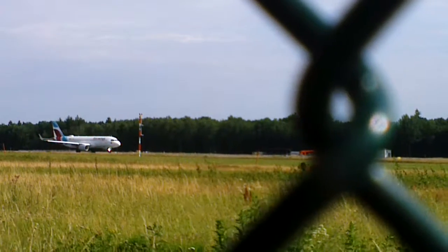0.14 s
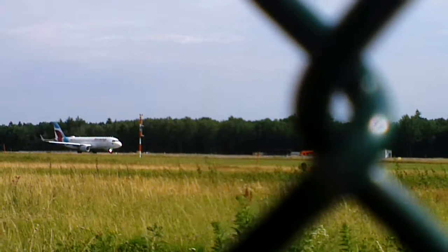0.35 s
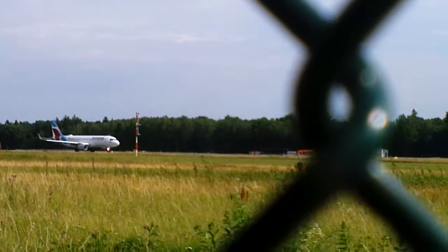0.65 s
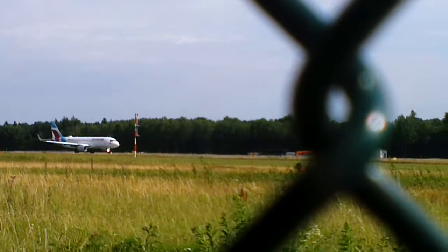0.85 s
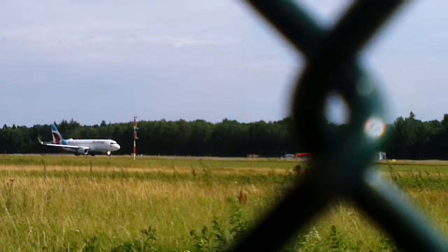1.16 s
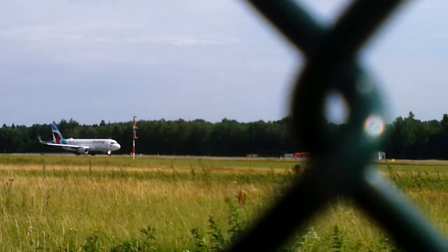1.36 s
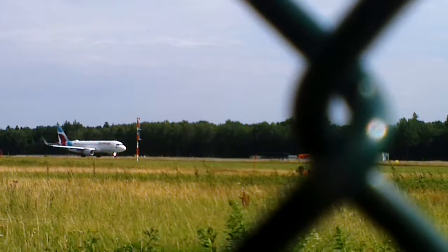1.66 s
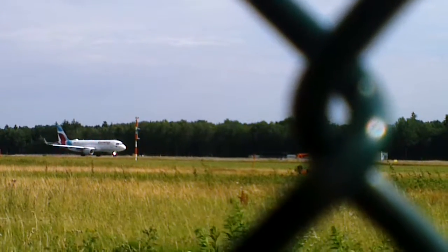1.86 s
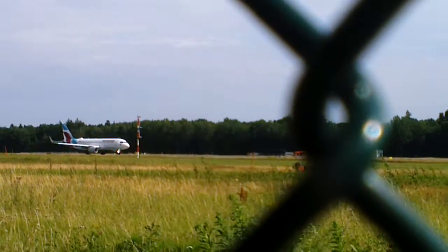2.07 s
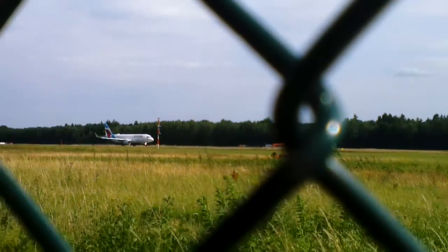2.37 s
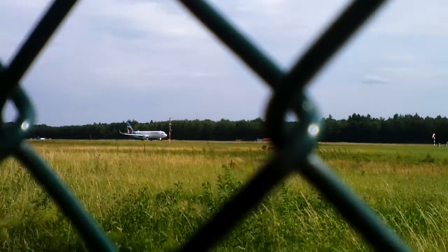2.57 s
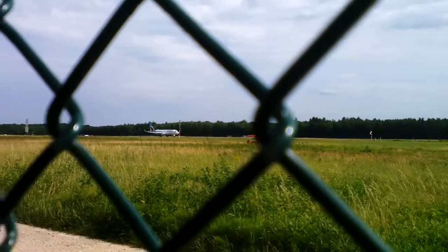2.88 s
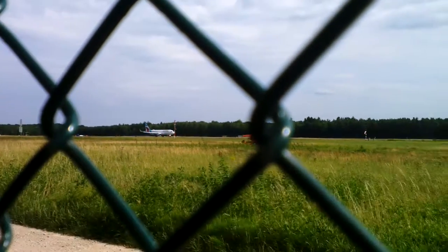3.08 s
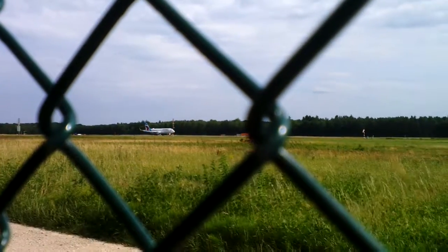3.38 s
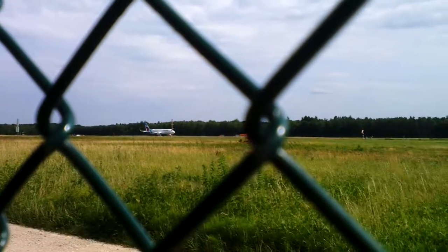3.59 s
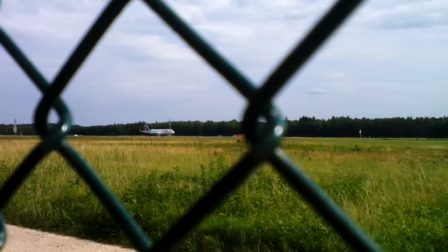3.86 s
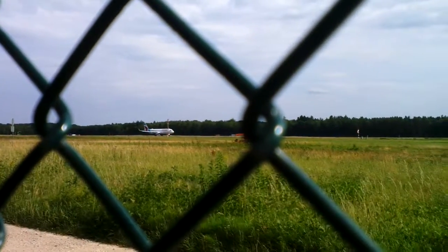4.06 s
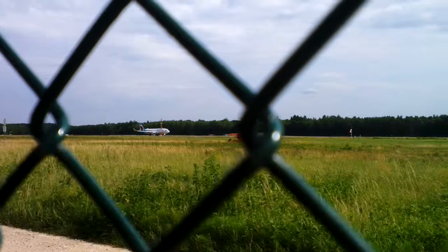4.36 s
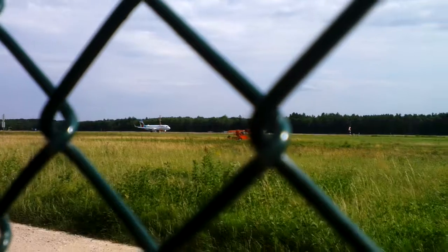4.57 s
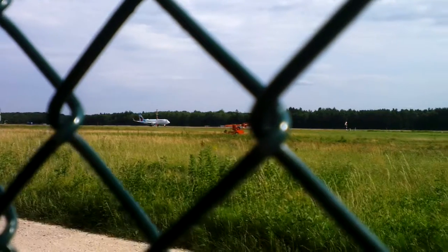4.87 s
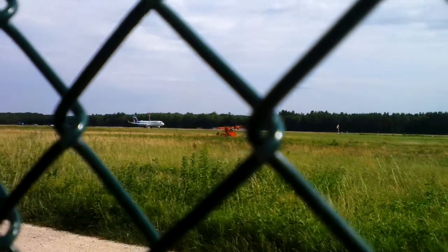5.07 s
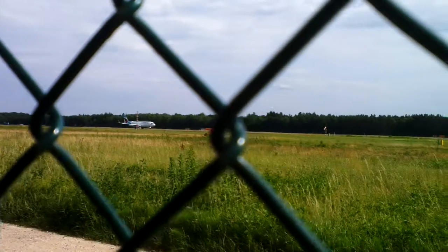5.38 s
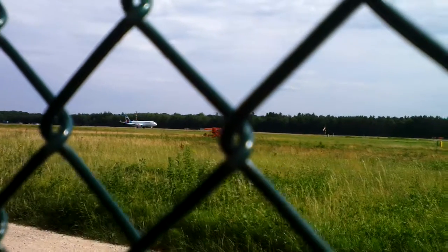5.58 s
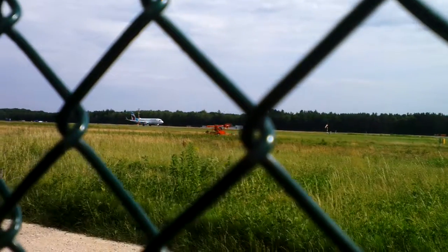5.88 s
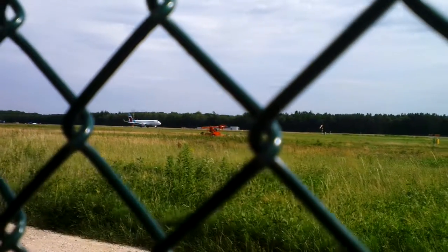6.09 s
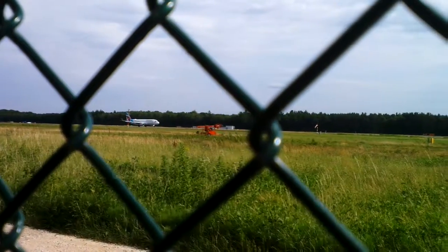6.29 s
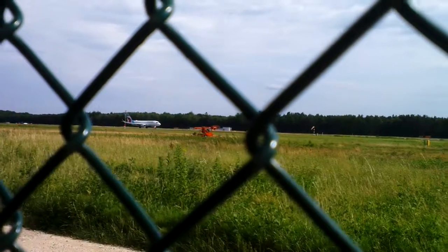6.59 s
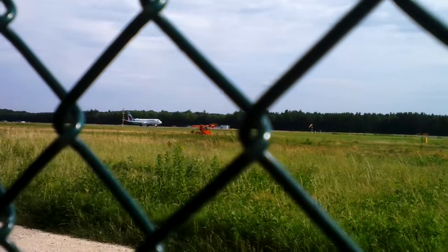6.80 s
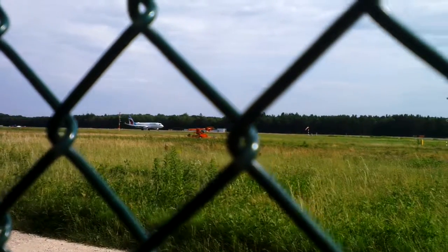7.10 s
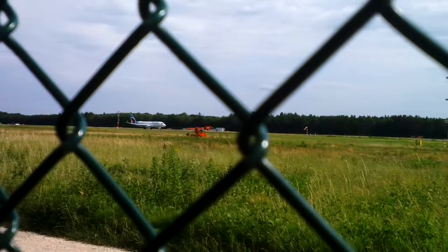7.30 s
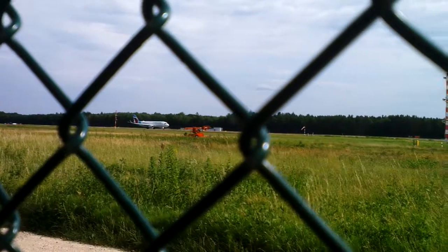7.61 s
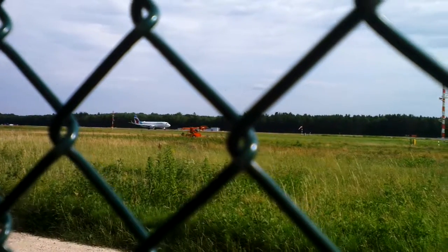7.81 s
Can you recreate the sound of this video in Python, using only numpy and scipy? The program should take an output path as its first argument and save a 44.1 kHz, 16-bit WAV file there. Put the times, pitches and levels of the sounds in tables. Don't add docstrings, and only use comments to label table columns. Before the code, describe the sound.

In an open meadow, a distant twin-engine airliner is heard on a small stereo microphone. At 0 s its engines give a quiet, wavering whine around 1 kHz in thin, airy noise. The pitch climbs until about 1.6 s, holds near 1.6 kHz until 2.5 s, then rises again, reaching about 2.6 kHz by 4.7 s. The roar swells strongly between 3 and 5 s, gaining a rough, raspy buzz beneath the whine, then stays loud and nearly steady in pitch, flickering as moving air bends it, to the end near 8 s. Dull wind knocks, stronger on the right, cluster at 1-1.7 s and 2.5 s, with light taps until 3.3 s; bigger bumps come at 5.2-6.4 s, strongest around 5.9 and 6.2 s, then thin out. From 2.75 s a bush cricket scrapes fast and high, around 10 kHz, slightly left, half masked by the jet. Faint insect and leaf hiss continues throughout.

```python
import sys
import numpy as np
from scipy import signal
from scipy.fft import rfft, irfft
from scipy.io import wavfile
from scipy.ndimage import uniform_filter1d, minimum_filter1d

SR = 44100
rng = np.random.default_rng(int(sys.argv[2]) if len(sys.argv) > 2 else 0)


def invert_db(level):
    return 10 ** (np.asarray(level, dtype=float) / 20)


def wav_out(sig):
    wavfile.write(sys.argv[1], SR, np.round(np.clip(np.atleast_2d(sig).T, -1, 1) * 32767).astype(np.int16))


N = 350532
TIME = np.arange(N) / SR

# (time [s], blade-passing frequency [Hz])
FAN_SPEED = [(0.0, 1026), (0.25, 1084), (0.7, 1256), (1.05, 1445), (1.4, 1552), (1.65, 1585), (2.5, 1577),
             (2.9, 1689), (3.2, 1850), (3.9, 2268), (4.25, 2421), (4.7, 2603), (4.9, 2641), (5.1, 2675),
             (5.4, 2692), (6.3, 2710), (6.8, 2725), (7.95, 2731)]
# (blade rate [Hz], second [dB], third [dB])
BLADE_OVERTONES = [(1010, -7.5, 0.5), (1290, -1.5, 1), (1620, -0.5, -20), (1790, 6.5, -11),
                   (2230, -4.5, -21), (2320, -14, -30), (2600, -20.5, -59.5), (2640, -30, -61)]
# (time [s], level [dB])
CORE_WHISTLE = [(.7, -73), (1.1, -59), (1.8, -59.5), (2.6, -59.5), (3.1, -68), (3.6, -76)]
BUZZ_ORDERS = list(zip([9, 11, 12, 14, 15, 16, 17, 19, 20, 22, 23, 24, 27, 28, 30, 32, 35, 39, 41, 47, 52, 56],
               [-52, -52, -44, -41, -39, -40, -37, -34, -33, -39, -48, -36, -40, -40, -39, -37, -34, -36, -35, -36, -42, -42],
               [-47, -44, -50, -41, -43, -42, -39, -38, -39, -36, -42, -29, -41, -38, -40, -37, -37, -38, -38, -37, -42, -45]))
# (blade rate [Hz], level [dB])
TIP_SHOCK = [(2200, -35), (2440, -12), (2620, -5), (2700, -1.5)]
# (shaft order, time [s], height [dB], half length [s])
BUZZ_LOBES = [(24, 6.55, 5.5, 0.13), (24, 7.38, 6, 0.076), (24, 7.75, -6.5, 0.18), (22, 7.45, -5, 0.093),
              (19, 5.23, 0, 0.16), (14, 7.5, 5, .15), (24, 6, -8, .12), (28, 6.6, 12, .1),
              (19, 6.15, 7, 0.064), (20, 5.7, -1, 0.17), (17, 7.5, 5, .1)]
# (frequency [Hz], density [dB per Hz])
PART_POWER_ROAR = [(60, -84), (100, -48), (250, -31.5), (540, -21), (1300, -13), (1800, -14.5),
                   (2100, -14.5), (2730, -7), (3500, -6.5), (4700, -18), (6700, -34), (8700, -62),
                   (14700, -120)]
# (frequency [Hz], density [dB per Hz])
FULL_POWER_ROAR = [(60, -99), (100, -67), (250, -37.5), (680, -15), (920, -13), (1300, -10), (1650, -9),
                   (1950, -16), (2400, -9), (2900, -7.5), (3620, -9), (5000, -25), (6700, -38.5),
                   (8700, -64.5), (12000, -83.5)]
# (centre [blade multiples], width [blade multiples], height [dB])
BLADE_HUMPS = [
    (1., .08, 3.5),
    (2., .12, 1.5),
    (2.85, .2, 2.5),
    (3.9, .2, 5.5),
]
# (low edge [Hz], high edge [Hz])
POWER_BANDS = [
    (800, 1000),
    (3300, 4200),
    (5800, 7000),
]
# (frequency [Hz], likeness [0-1])
PORT_LIKENESS = [(60, 0.41), (120, 0.69), (230, 0.88), (440, 0.84), (850, 0.56), (1660, 0), (3220, 0.45),
                 (6250, 0.26)]
# (frequency [Hz], left minus right [dB])
PORT_LEAN = [(60, -5), (100, -9), (170, -1), (280, 2), (470, -2), (790, -1), (1330, -1.5), (2230, -2.0),
             (3730, -4.5), (6250, -9.5)]
# (time [s], left minus right [dB])
DIRECTION = [(0.0, -1.5), (2.1, -3.5), (2.65, -2.5), (2.97, -4.0), (6.77, -2.5), (7.95, -4)]
# (time [s], jet rumble [dB], treble clearness of the air path [dB], blade tone over roar [dB])
AIR_PATH = [(0.0, -59.5, 5, 4), (0.5, -60, 7, -4), (0.9, -57, 8, -2), (1.2, -56.5, 9.5, 4.5),
            (1.6, -58, 10.5, 3.5), (2.4, -58, 13.5, 5), (2.8, -56, 9.5, -2), (3.3, -54, 14, -4.5),
            (3.75, -50, 16, 4.5), (4.1, -47.5, 16.5, 2.5), (4.7, -42.5, 17, 7), (5.2, -39, 16.5, 3.5),
            (5.7, -38, 12, 6), (6.0, -38.5, 10.5, 0), (6.55, -37, 14.5, 2.5), (6.9, -39.5, 10, 6),
            (7.4, -39.5, 8, 7.5), (7.95, -37.5, 4.5, 3)]
# (time [s], change [dB])
LENS_EDDIES = [(.1, -1), (.6, 2.5), (1.2, 1.5), (1.82, 6), (2.1, 3.5), (2.6, 5), (3.62, 0.5), (4.698, 2.5),
               (5.2, 3), (5.301, 0), (5.431, 11), (5.88, 9), (6.3, 4), (6.499, 12.5), (6.6, -2.5),
               (6.99, 1), (7.06, -15), (7.2, 2.5), (7.31, 2.5), (7.42, 0.5), (7.5, -6), (7.6, 5.5),
               (7.7, 4.5)]
# (time [s], level [dB], half length [s])
WIND_GUSTS = [(0.398, -59, 0.084), (0.807, -56, 0.1), (1.123, -50.5, 0.13), (1.675, -49.5, 0.12),
              (1.85, -67, 0.095), (2.527, -49.5, 0.034), (2.905, -57, 0.091), (5.4, -55, .15),
              (5.72, -58, 0.17), (6.3, -59.5, 0.25), (6.93, -54, 0.2)]
# (time [s], peak [dB], pitch [Hz], length [ms])
PORT_KNOCKS = [(0.194, -29.5, 526, 11.4), (0.21, -31, 312, 8.1), (0.844, -33, 460, 9.5),
               (1.035, -31, 416, 12), (1.068, -27, 445, 2.1), (1.115, -26, 323, 14.7),
               (1.14, -34, 420, 9.7), (1.349, -32.5, 682, 14), (1.509, -23.5, 380, 7.2),
               (1.527, -31, 622, 13), (1.557, -25, 595, 17.2), (1.568, -20, 301, 16.5),
               (1.657, -24.5, 292, 14), (1.727, -34, 453, 14), (2.511, -26, 653, 9.3),
               (2.549, -26, 496, 8.6), (2.601, -30.5, 357, 10.7), (5.234, -25, 310, 16),
               (5.311, -30, 543, 11), (5.484, -22, 611, 10), (5.587, -22.5, 455, 9.8),
               (5.623, -21, 730, 11), (5.868, -23.5, 720, 20), (5.901, -16.5, 362, 13.4),
               (6.208, -23, 730, 24), (6.234, -14, 648, 8.9), (6.317, -21, 450, 13.4),
               (6.359, -19, 524, 10.3), (6.773, -28, 407, 7.1), (7.038, -30, 616, 9.4)]
# (time [s], peak [dB])
LIGHT_TAPS = [(0.484, -43), (0.791, -48), (0.942, -40), (0.977, -41), (1.179, -44), (1.26, -39),
              (1.481, -38), (1.63, -40), (1.769, -39), (1.909, -40), (2.302, -42.5), (2.476, -37),
              (2.803, -39.5), (2.92, -52), (2.969, -42), (3.168, -39), (3.349, -39)]
# (time [s], level [dB])
CRICKET_LEVEL = [(2.76, -55.5), (3.3, -58), (3.8, -61), (4.3, -57), (5.35, -57.5), (5.95, -63), (6.55, -55),
                 (6.85, -60.5), (7.2, -53), (7.95, -62)]
# (time [s], strokes so far)
WING_STROKES = [(2.76, 0.06), (2.96, 4.46), (3.7, 20.14), (5.56, 60.37), (6.16, 72.87), (7.5, 101.7),
                (7.95, 111.14)]
# (place [strokes], width [strokes], level [dB])
SCRAPES = [
    (.2, .035, 0),
    (.52, .05, -3),
    (.85, .06, -15),
]
# (frequency [Hz], density [dB per Hz])
WING_RESONANCE = [(8000, -25.5), (8700, -10), (9400, -2), (9900, 5), (10700, 0.5), (11350, -5.5),
                  (12000, -10), (13000, -21.5), (14500, -27)]
# (frequency [Hz], density [dB per Hz])
MEADOW_COLOUR = [(6000, -11), (7500, 0), (9500, -2), (11000, -4), (13500, -14.5), (15300, -14)]

BLADES, CORE_ORDER = 36, 128
TWIN_SLIP, TWIN_DB = .007, -3.5
GOVERNED_HZ = 2450, 2690
TIPS_CLEAR = 0.21
EDDY_S, EDDY_ON_ROAR = 0.022, 0.2
HISS_DB, HISS_FULL_DB = -12.5, -6
FRAME = 512
CALM_DB = -69
TAP_HZ, TAP_MS = 435, 10.7
SINGING_S = 2.75
CRICKET_BLUR, BLUR_PER_S = .16, .18
CEILING, LIMIT_S = .8, .004


def read(table, t):
    s, *columns = np.transpose(table)
    return np.array([np.interp(t, s, c) for c in columns])


def on_log(table, hz):
    log_table = [(np.log(max(f, 1)), v) for f, v in table]
    return read(log_table, np.log(np.maximum(hz, 1)))[0]


def bumps(t, rows):
    return sum(h * np.exp(-((t - s) / w) ** 2 / 2) for s, h, w in rows)


def unit(x):
    return x / np.sqrt(np.mean(np.abs(x) ** 2))


def band(x, lo_hz, hi_hz):
    return signal.sosfilt(signal.butter(2, [lo_hz, hi_hz], "band", fs=SR, output="sos"), x)


def colour(x, table):
    gain = invert_db(on_log([(table[0][0] / 2, -90)] + table, np.fft.rfftfreq(N, 1 / SR)))
    return irfft(rfft(x) * gain, N) / np.sqrt(np.mean(gain ** 2))


def walk(shape, *spans):
    x = rng.standard_normal(shape)
    for k, span in enumerate(spans[::-1]):
        span = max(int(span), 1)
        for _ in range(2):
            x = uniform_filter1d(x, span, axis=-1 - k)
    return unit(x)


def pair(mid, side, alike):
    alike = np.clip(alike, 0, 1)
    common, own = np.sqrt(1 + alike) * mid, np.sqrt(1 - alike) * side
    return np.array([common + own, common - own]) / np.sqrt(2)


def shimmer(rate_hz, steady, alike):
    step = 32
    span = SR / step / rate_hz / 2
    mid, side = (np.dot((1, 1j), walk((2, N // step + 1), span)) for _ in range(2))
    paths = np.array([np.interp(np.arange(N) / step, np.arange(len(c)), c) for c in pair(mid, side, alike)])
    steady = np.clip(steady, 0, 1)
    return np.sqrt(steady) + np.sqrt((1 - steady) / 2) * paths


def arrival(t):
    eddy = bumps(t, [(s, db, EDDY_S) for s, db in LENS_EDDIES])
    return (*read(AIR_PATH, t), eddy)


def buzz_lines(blade_hz, turns):
    clear = arrival(TIME)[1]
    rolled = np.clip((TIME - 5.6) / 2.27, 0, 1)
    tips = read(TIP_SHOCK, blade_hz)[0] + TIPS_CLEAR * (clear - 13)
    lines = []
    for order, early, late in BUZZ_ORDERS:
        lobes = bumps(TIME, [row[1:] for row in BUZZ_LOBES if round(row[0]) == order])
        db = early + (late - early) * rolled + tips + lobes
        lines.append((order, turns, db, 7., .75))
    return lines


def tones():
    blade_hz = read(FAN_SPEED, TIME)[0]
    locked = np.interp(blade_hz, GOVERNED_HZ, (0, 1))
    turns = np.cumsum(blade_hz) / SR / BLADES
    twin_hz = blade_hz * (1 - TWIN_SLIP * (1 - .85 * locked))
    twin = np.cumsum(twin_hz) / SR / BLADES

    rumble, clear, tone, eddy = arrival(TIME)
    first = rumble + clear + tone + eddy
    line_db = [first, *(first + read(BLADE_OVERTONES, blade_hz))]
    steadiness = 0.1 + 0.51 * locked
    # shaft order, shaft turns, level [dB], fading rate [Hz], steady share
    lines = [(BLADES * (k + 1), turns, db, rate, steadiness)
             for k, (db, rate) in enumerate(zip(line_db, (40., 60., 80.)))]
    lines += [(order, twin, db + TWIN_DB - 5 * locked, rate, steady) for order, _, db, rate, steady in lines[:2]]
    lines += [(CORE_ORDER, turns, read(CORE_WHISTLE, TIME)[0], 70., .05)]
    lines += buzz_lines(blade_hz, turns)

    out = 0
    for order, shaft, db, rate, steady in lines:
        wave = invert_db(db) * np.exp(2j * np.pi * order * shaft)
        lean = on_log(PORT_LEAN, order * blade_hz.mean() / BLADES) / 2
        balance = np.sqrt(2) * invert_db(np.array([[lean], [-lean]]))
        out = out + balance * np.imag(wave * shimmer(rate, steady, 0.3))
    return out


def roar_level(hz, t):
    blade_hz = read(FAN_SPEED, t)[0]
    thrust = np.clip((blade_hz - 1600) / 1000, 0, 1)
    part, full = (on_log(table, hz)[:, None] for table in (PART_POWER_ROAR, FULL_POWER_ROAR))
    db = (1 - thrust) * part + thrust * full
    multiple = hz[:, None] / blade_hz
    db = db + sum(h * np.exp(-((multiple - m) / w) ** 2 / 2) for m, w, h in BLADE_HUMPS)

    power = []
    for lo, hi in POWER_BANDS:
        density = (invert_db(db[(hz >= lo) & (hz < hi)]) ** 2).mean(axis=0)
        power.append(density * (hi - lo) / (SR / 2))
    rumble, clear, _, eddy = arrival(t)
    middle = rumble + clear + EDDY_ON_ROAR * eddy
    wanted = np.array([rumble, middle, middle + HISS_DB + HISS_FULL_DB * thrust])
    change = wanted - 10 * np.log10(np.array(power))
    centres = np.mean(POWER_BANDS, axis=1)
    share = np.array([on_log(zip(centres, row), hz) for row in np.eye(3)])
    db = db + share.T @ change
    return db + 0.16 * walk(db.shape, 52, 8) + 0.8 * walk(db.shape, 10, 4)


def roar():
    hz, t, (mid, side) = signal.stft(rng.standard_normal((2, N)), SR, nperseg=FRAME)
    db = roar_level(hz, t)
    lean = on_log(PORT_LEAN, hz)[:, None] / 2
    alike = 1.06 * on_log(PORT_LIKENESS, hz)[:, None]
    both = pair(mid, side, alike) * invert_db(db + np.array([lean, -lean]))
    return signal.istft(both, SR, nperseg=FRAME)[1][:, :N]


def gusts():
    lumps = invert_db(4.9 * walk((2, N), 300)) * rng.standard_normal((2, N))
    right, own = (unit(band(band(x, 190, 570), 182, 810)) for x in lumps)
    strength = invert_db(CALM_DB) + bumps(TIME, [(s, invert_db(db), w) for s, db, w in WIND_GUSTS])
    return strength * invert_db(np.array([[-4.5], [2.5]])) * np.array([0.67 * right + 0.51 * own, right])


def port_knocks():
    knocks = np.zeros((2, N))
    rows = PORT_KNOCKS + [(s, db, TAP_HZ, TAP_MS) for s, db in LIGHT_TAPS]
    for (s, db, hz, ms), chance in zip(rows, rng.random((len(rows), 4))):
        u = np.arange(int(max(ms, 3) * SR / 1000)) / SR
        shape = np.sin(np.pi * (u / u[-1]) ** 0.85) ** 2
        cycles = hz * u * (1.35 - 0.487 * u / u[-1])
        offset = chance[:2, None] * np.array([[.3], [0]]) + chance[2]
        phase = 2 * np.pi * (cycles + offset)
        upper = np.sin(1.86 * phase + 2 * np.pi * chance[3])
        wave = np.sin(phase) + np.array([[.3], [.6]]) * upper + 0.57 * np.sin(0.535 * phase)
        i = int(s * SR)
        knocks[:, i:i + len(u)] += invert_db(db + np.array([[-6.5], [2.5]])) * shape * wave
    return band(knocks, 300, 1150) + .02 * np.abs(knocks)


def cricket():
    db = read(CRICKET_LEVEL, TIME)[0]
    stroke = read(WING_STROKES, TIME)[0] + SCRAPES[0][0]
    singing = TIME > SINGING_S
    sizes = invert_db(2.3 * rng.standard_normal((200, 3)))[stroke.astype(int)].T
    place = stroke % 1
    gate = sum(g * invert_db(h) * np.exp(-((place - p) / w) ** 2 / 2) for g, (p, w, h) in zip(sizes, SCRAPES))
    blur = np.clip(CRICKET_BLUR + BLUR_PER_S * (TIME - SINGING_S), 0, .35)
    clicks = 3.2 * gate * invert_db(3.0 * walk(N, 25))
    gate = singing * ((1 - blur) * clicks + 1.4 * blur)
    mid, side = (colour(gate * rng.standard_normal(N), WING_RESONANCE) for _ in range(2))
    return pair(mid, side, 0.16) * invert_db(db + np.array([[3.5], [-1.5]]))


def meadow():
    level_db = np.array([[-66], [-69]]) + 0.62 * walk(N, 6000)
    return colour(rng.standard_normal((2, N)), MEADOW_COLOUR) * invert_db(level_db)


def scene():
    pan_db = read(DIRECTION, TIME)[0] + 3.63
    swell_db = 1.26 * walk(N, 1500)
    aircraft = (tones() + roar()) * invert_db(swell_db + np.array([pan_db, -pan_db]) / 2)
    return aircraft + gusts() + port_knocks() + cricket() + meadow()


def roll_off(x):
    return signal.sosfilt(signal.butter(12, 15700, fs=SR, output="sos"), x)


def record(dry):
    x = signal.sosfilt(signal.butter(2, 120, "high", fs=SR, output="sos"), dry)
    x = x + invert_db(-52) * dry
    span = int(LIMIT_S * SR)
    peak = np.abs(x).max(axis=0)
    gain = minimum_filter1d(CEILING / np.maximum(peak, CEILING), 3 * span)
    mix = x * uniform_filter1d(uniform_filter1d(gain, span), span)
    return roll_off(mix)


dry = scene()
out = record(dry)
wav_out(out)
```